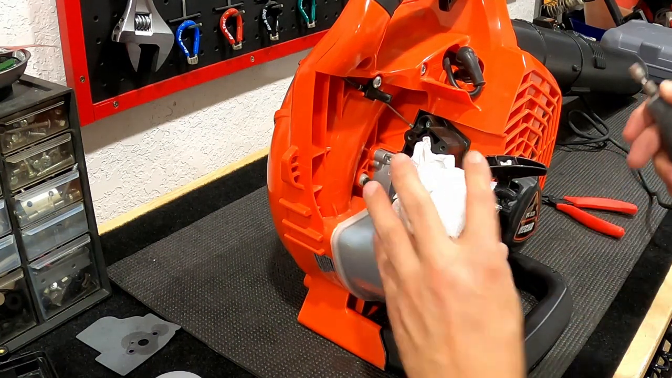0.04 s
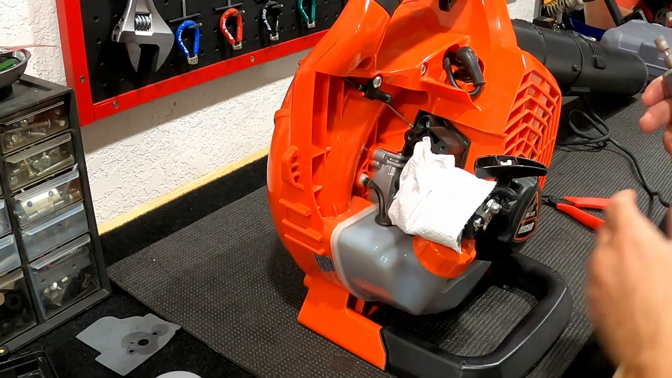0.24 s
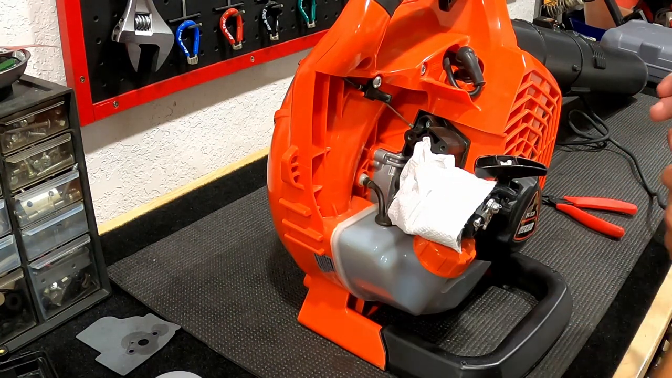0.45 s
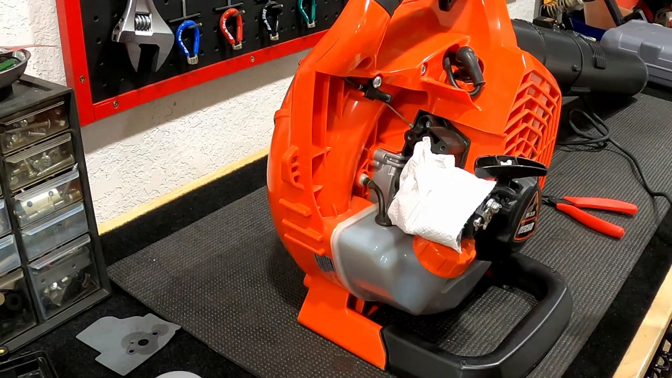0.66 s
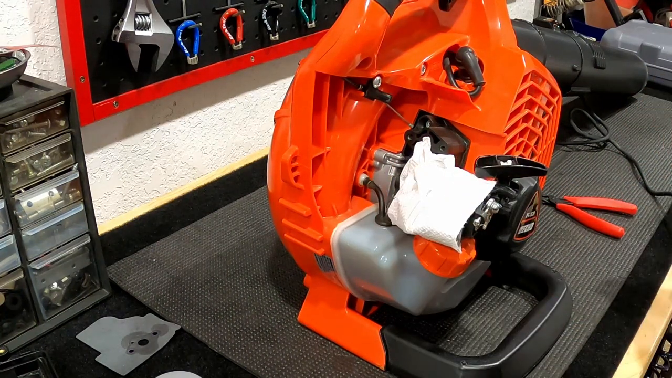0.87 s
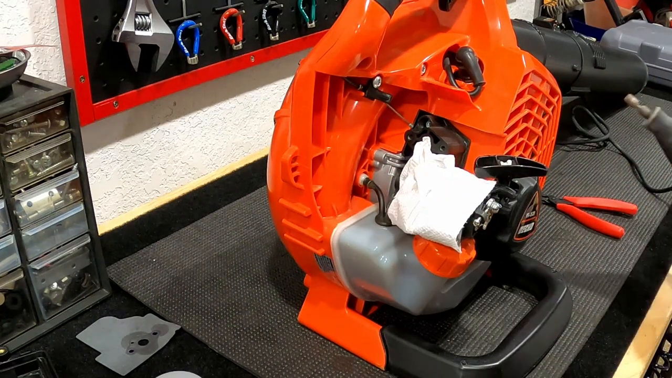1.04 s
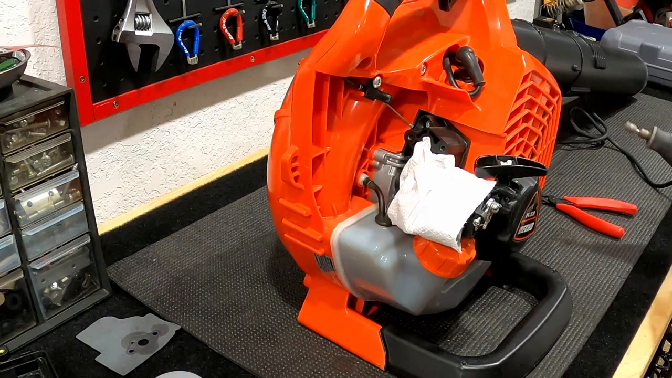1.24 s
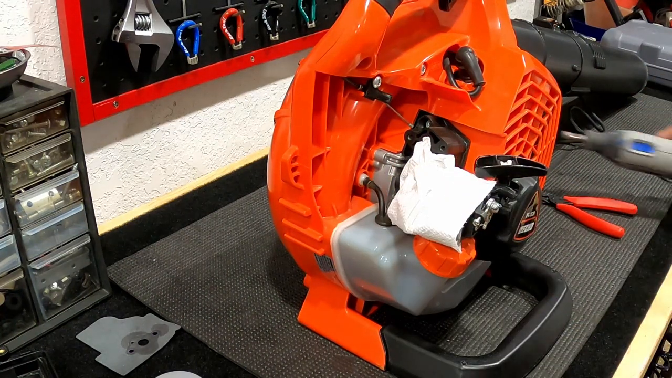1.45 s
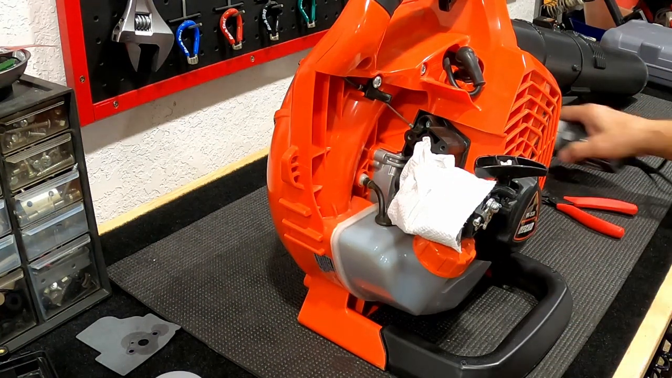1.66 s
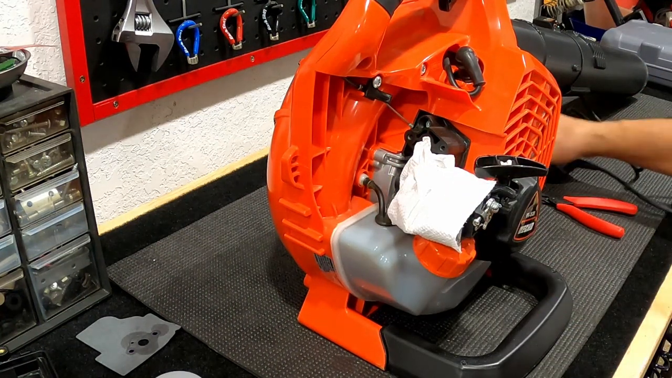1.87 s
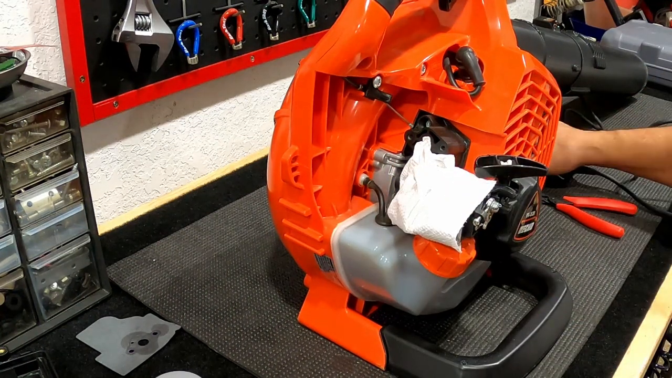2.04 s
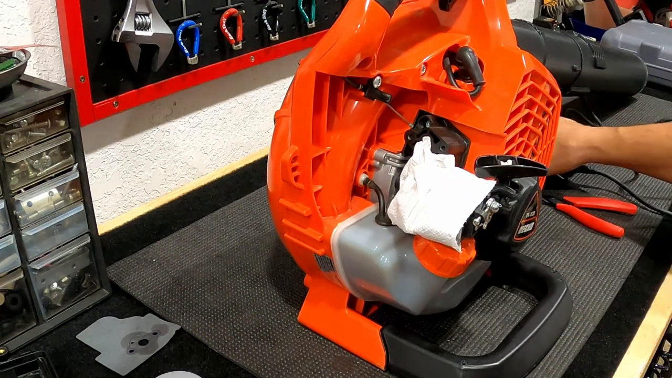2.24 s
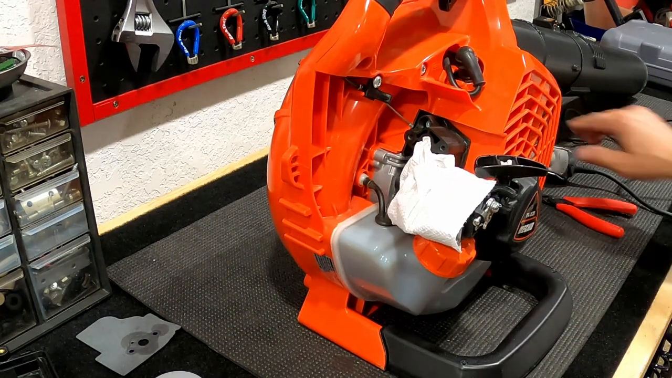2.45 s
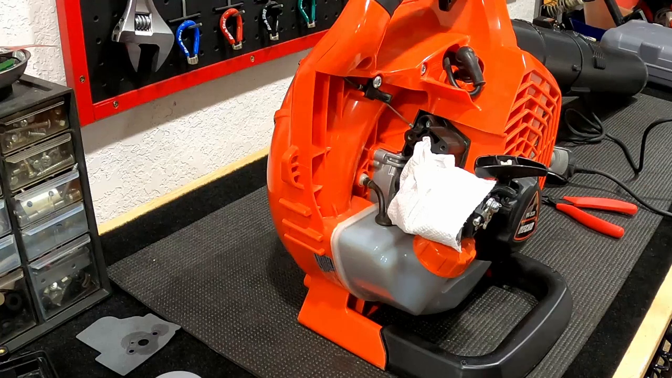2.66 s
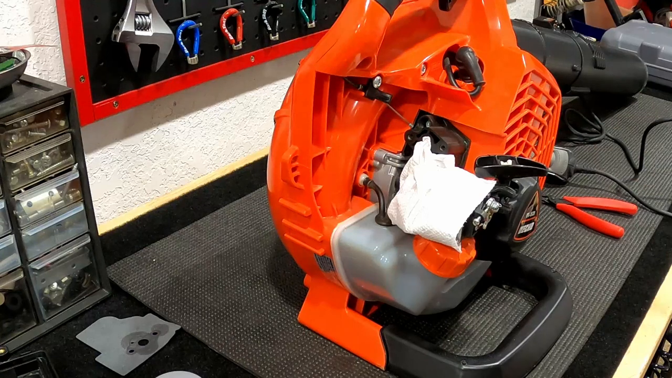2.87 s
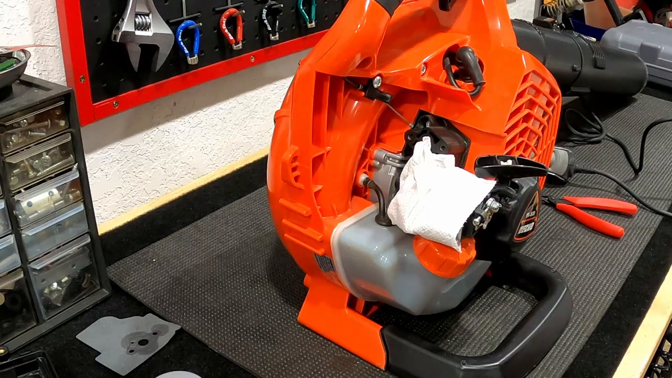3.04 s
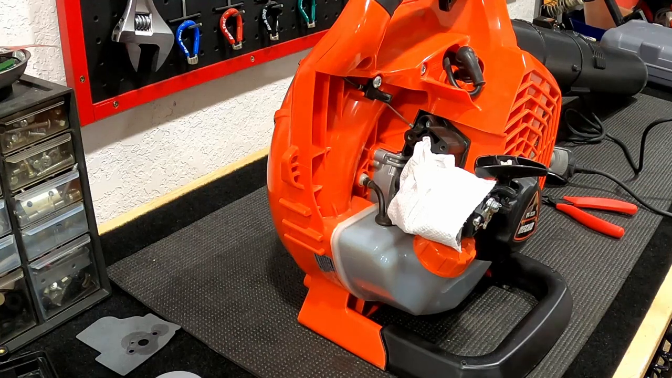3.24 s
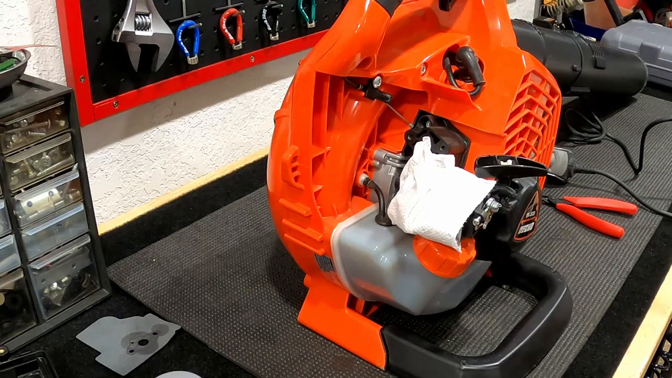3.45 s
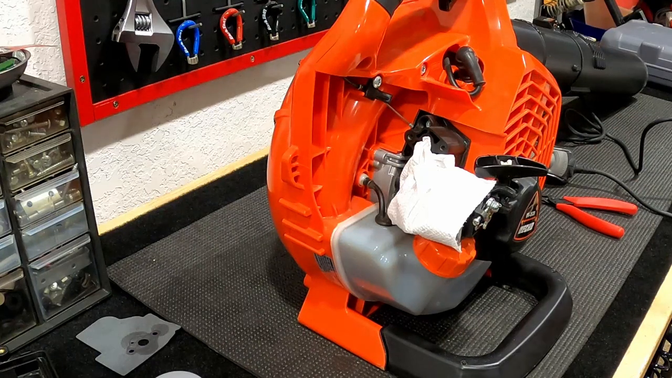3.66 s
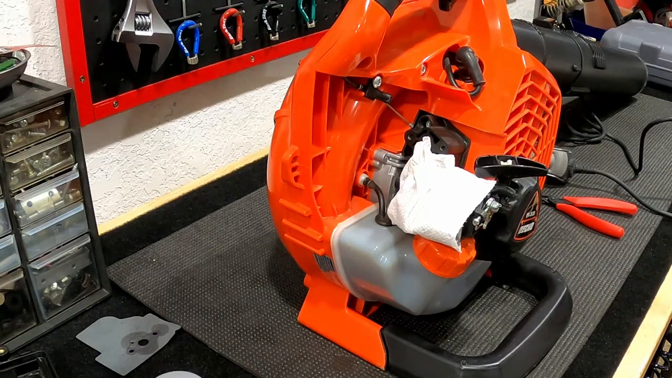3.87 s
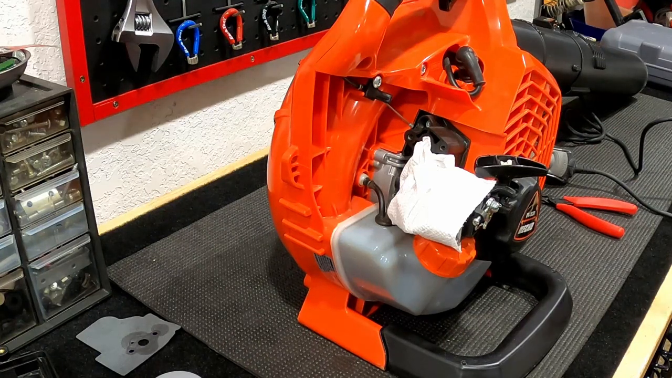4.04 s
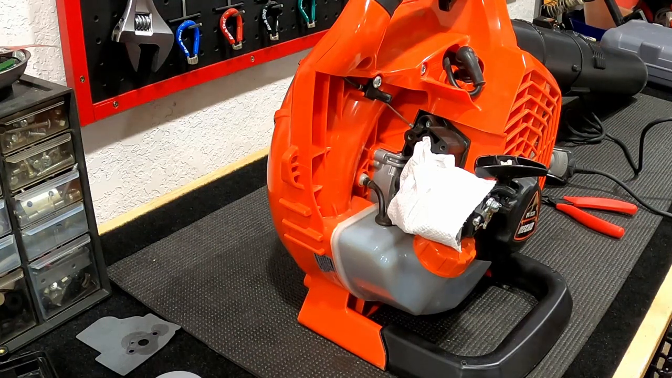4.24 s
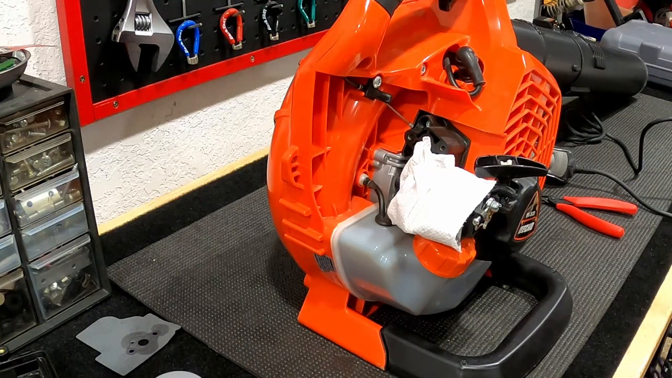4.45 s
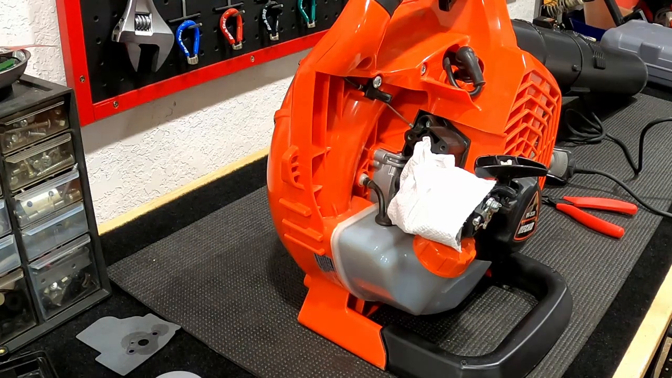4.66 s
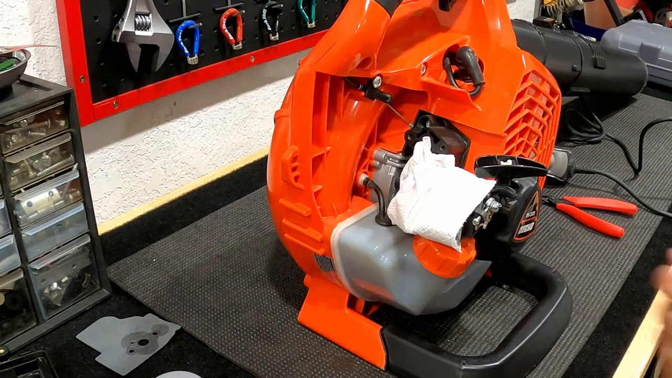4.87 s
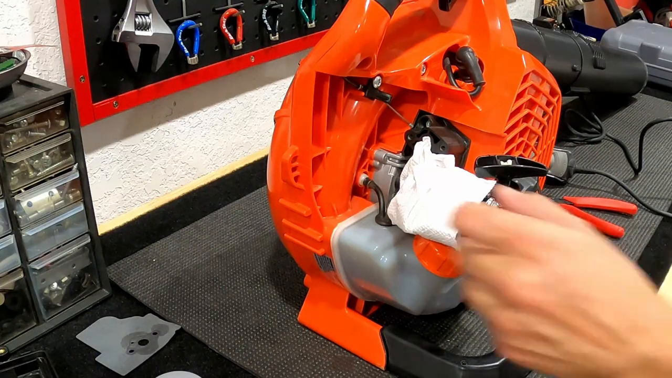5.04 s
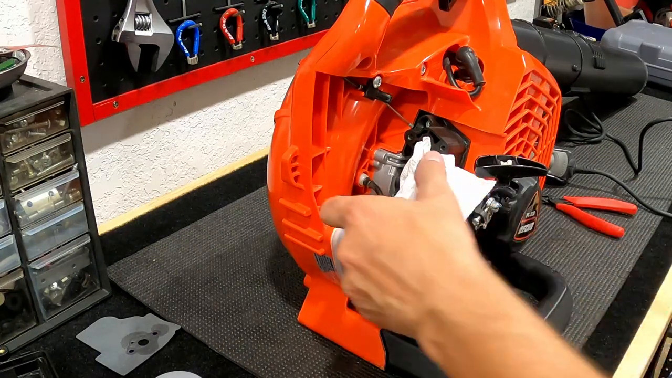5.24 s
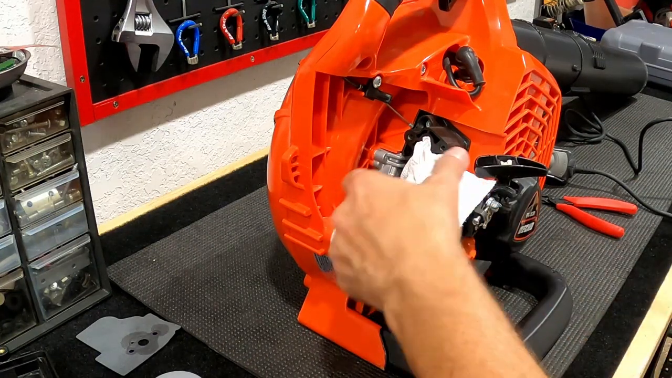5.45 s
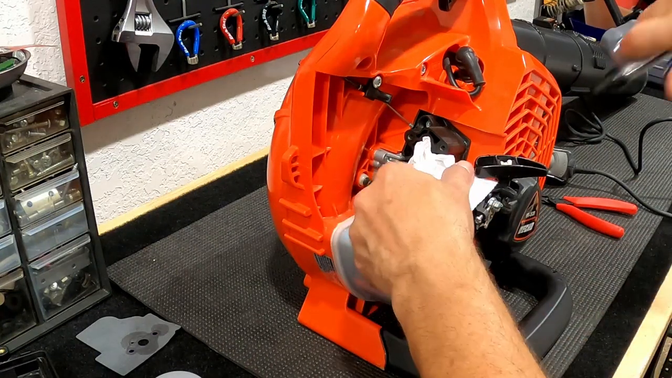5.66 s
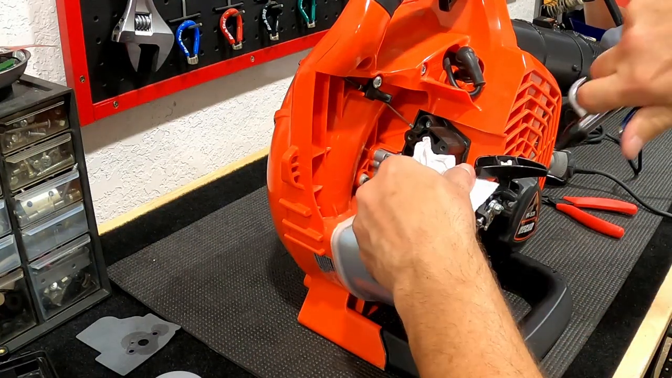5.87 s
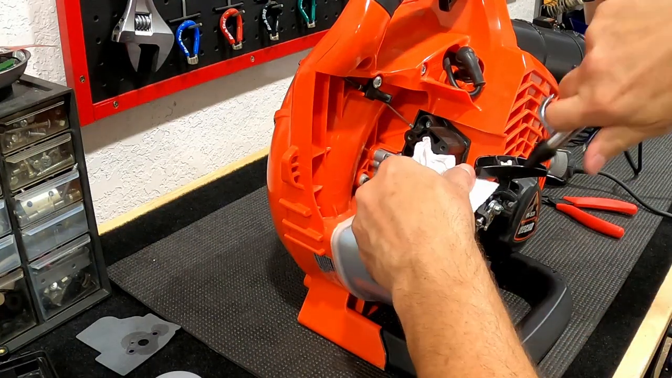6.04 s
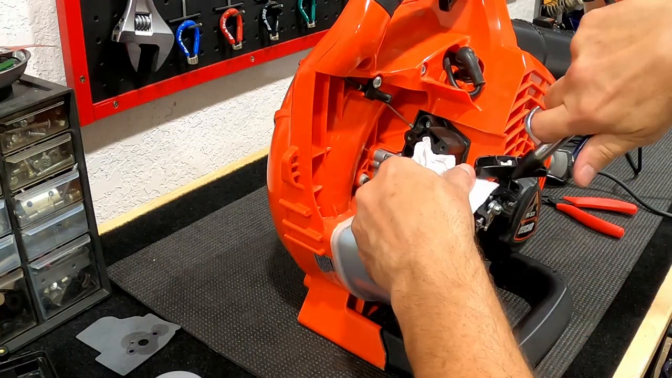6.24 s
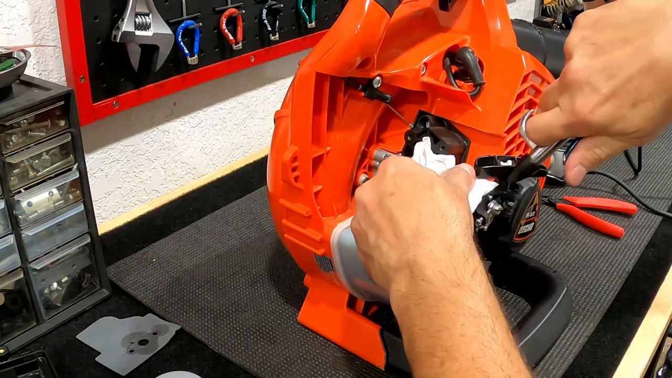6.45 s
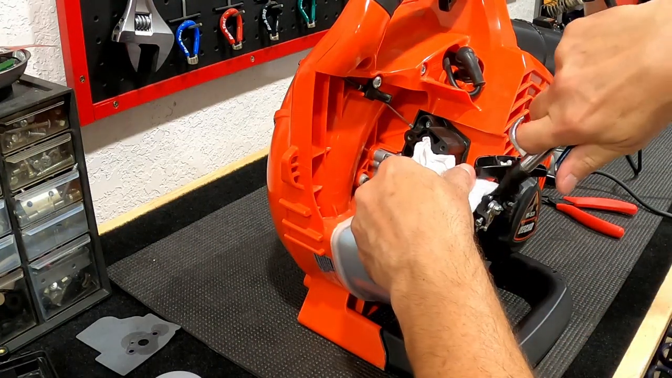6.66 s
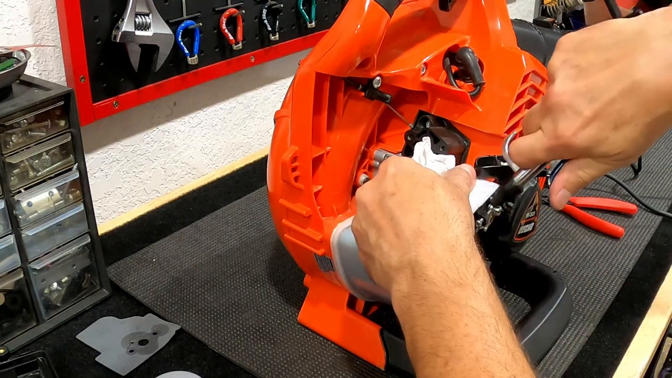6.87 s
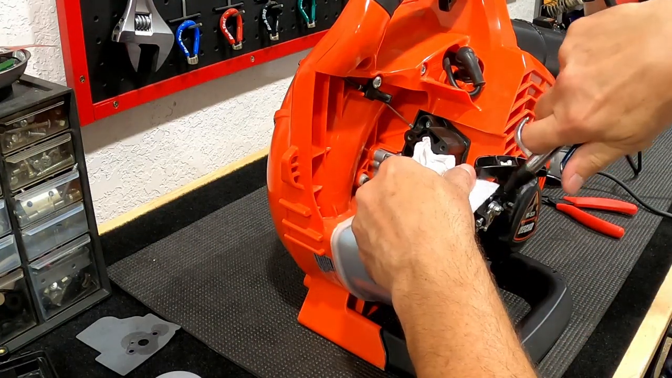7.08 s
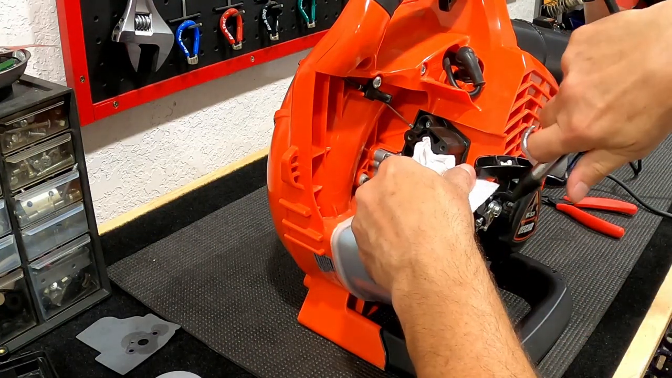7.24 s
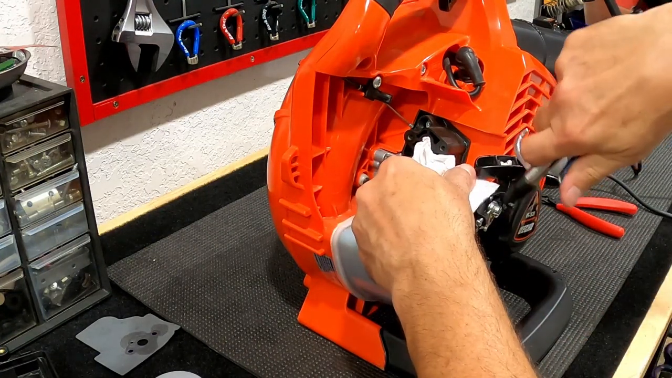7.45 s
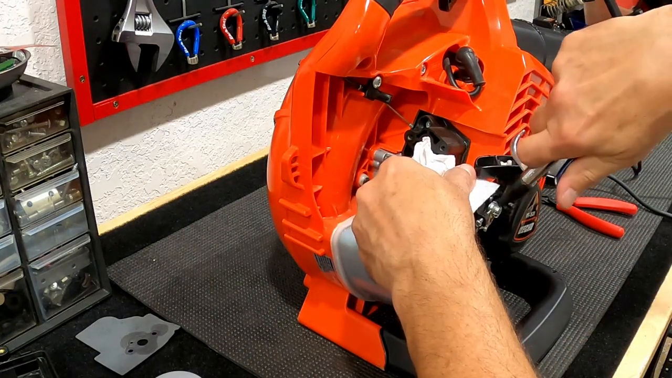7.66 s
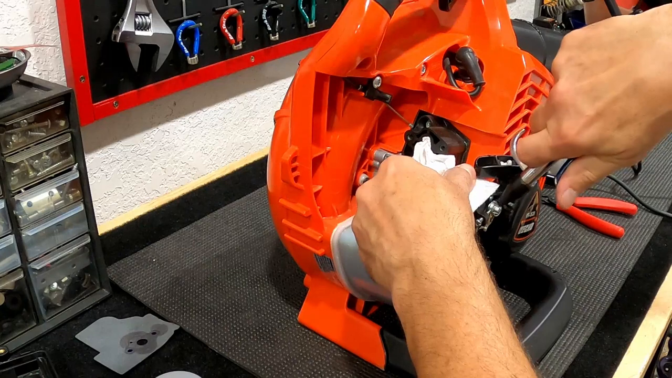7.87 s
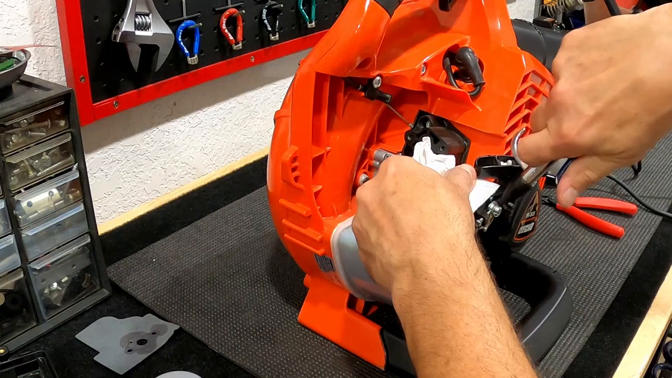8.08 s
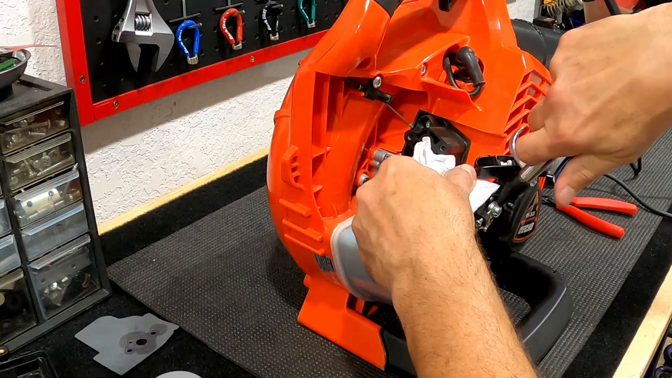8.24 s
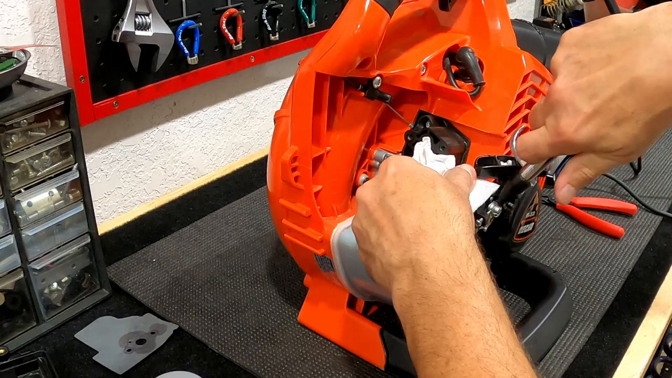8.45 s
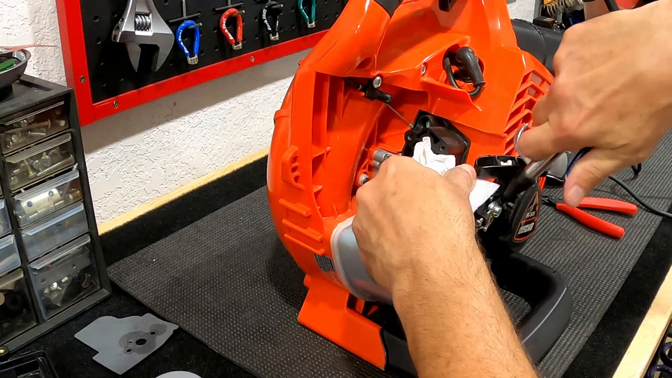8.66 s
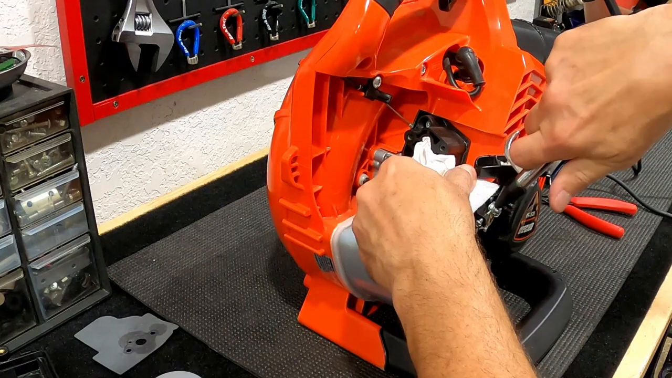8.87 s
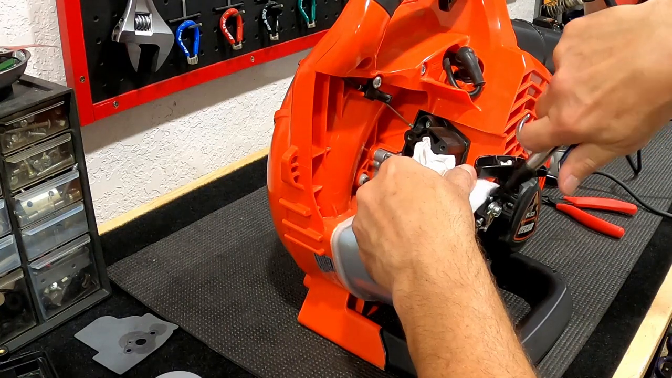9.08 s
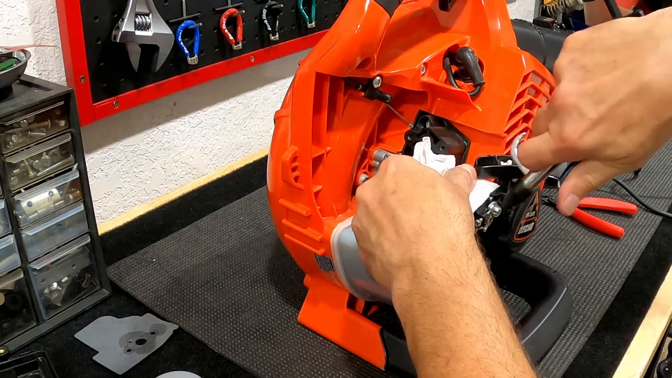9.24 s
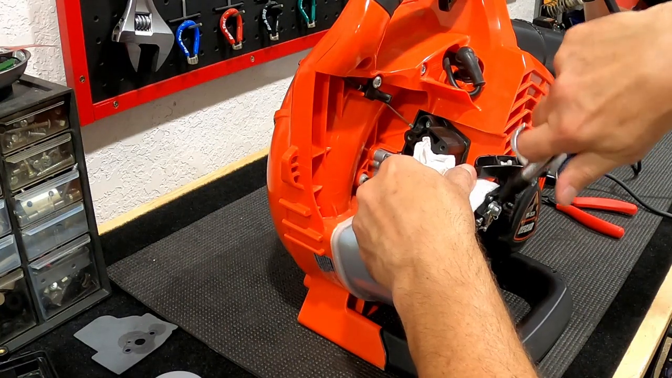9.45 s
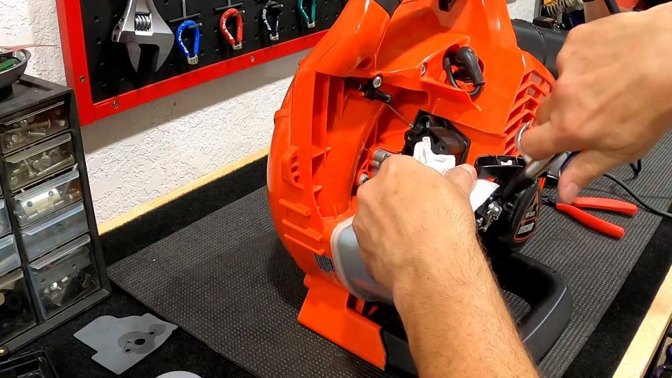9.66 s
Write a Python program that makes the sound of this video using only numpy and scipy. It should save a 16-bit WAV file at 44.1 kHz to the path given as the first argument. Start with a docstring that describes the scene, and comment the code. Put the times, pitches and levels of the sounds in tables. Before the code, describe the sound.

A rotary tool whines, winds down and is set down, then an air hose snaps in with a puff and a blow gun hisses loudly.

```python
"""In a workshop, a rotary tool whines over a bench, is switched off, coasts to a stop and is laid down.
Across the room an air hose snaps into its coupler with a puff of coloured noise and ringing metal.
Then a blow gun hisses in three blasts over an engine housing, its draught buffeting the right port at first.
The tool is made of sine waves tied to one slowing shaft, plus noise for its air and brushes.
Low rumble and electric hum lie under everything."""
import sys
import numpy as np
from scipy import signal
from scipy.fft import rfft, irfft, next_fast_len
from scipy.io import wavfile
from scipy.ndimage import uniform_filter1d, map_coordinates

SR = 44100
rng = np.random.default_rng(int(sys.argv[2]) if len(sys.argv) > 2 else 0)


def int16_out(signal):
    """Quantize to a 16-bit WAV file."""
    q = np.round(np.clip(np.atleast_2d(signal).T, -1, 1) * 32767)
    wavfile.write(sys.argv[1], SR, q.astype(np.int16))


N = 428211
TIME = np.arange(N) / SR  # s

# Noise colours give the relative level per Hz; each noise is then scaled to rms 1.
# rotary tool: the shaft under power: t/s, speed/Hz (turns per second)
POWERED_SPEED = [(0, 293), (.45, 300.7), (.6, 301.3), (.78, 300.5)]
POWER_OFF_S = .78
FRICTION_HZ_PER_S, AIR_DRAG_PER_TURN = 99.5, .00042
# overtones of the shaft and its bearings: multiple of the speed, driven level/dB, coasting level/dB
SHAFT_OVERTONES = [(1, -9, -11), (3, -13, -15), (4, -18, -23), (6, -18, -18), (7, -18, -10), (8, -30, -14),
                   (9, -14, -8), (10, -9, -15), (11, -15, -4), (12, -12, -7), (13, -16, -16),
                   (15, -11, -10), (16, -22, -12), (19, -22, -16), (21, -28, -14), (24, -13, -8)]
# how well the tool's shell radiates: f/Hz, level/dB
SHELL_RESPONSE = [(150, -22), (300, 1), (420, -16), (680, -13), (820, -4), (950, 3), (1200, -6), (1550, 3),
                  (1800, -5), (2100, -10), (2500, -2), (2850, 5), (3500, -5), (4200, -1), (6000, -1),
                  (8000, -4), (10000, -11), (16000, -45)]
# the fan tone swells and fades as the tool is turned: t/s, level/dB
FAN_LEVEL = [(0, -26.5), (.34, -31.5), (.6, -23.5), (.82, -26), (.9, -34.5), (1.48, -39.5), (1.57, -32.5),
             (1.63, -37.5), (1.79, -32), (2.06, -48.5), (2.52, -57), (2.65, -77), (3.4, -110)]
# the mains' half waves split the commutator tone: steps of 120 Hz, level against the fan tone/dB
COMMUTATOR_SPLIT = [(-1, -15), (0, -6), (1, -7), (2, -15), (3, -13), (4, -16)]
# colour of the cooling air: f/Hz, level/dB
COOLING_AIR_COLOUR = [(150, -41), (350, -13.5), (700, -11.5), (950, -3), (1400, 0.5), (2000, -0.5),
                      (2800, 4), (3500, 1.5), (4500, -2), (5800, -4), (7500, -17), (11000, -20),
                      (15000, -32)]
# colour of the brush hiss: f/Hz, level/dB
BRUSH_COLOUR = [(400, -11), (700, -14), (950, 1.5), (1500, 7.5), (2100, -1.5), (2900, 3), (4500, 2),
                (7000, -5.5), (9500, -6), (12500, -10), (15000, -20)]
# the whine: level at full speed, extra under power; its amplitude follows this power of the speed
WHINE_DB, WHINE_POWERED_DB, WHINE_SPEED_POWER = -31.4, 3.5, 1.1
# the cooling air: the same three settings
AIR_DB, AIR_POWERED_DB, AIR_SPEED_POWER = -33.3, 2.6, 3.8
# the brush hiss: level, extra under power, speed around which it starts to fade
BRUSH_DB, BRUSH_POWERED_DB, BRUSH_FADE_HZ = -42.5, 3.5, 90
# high multiples: most only rattle, those of the eight commutator bars stand out; all change under power
RATTLE_DB, BARS_DB, BARS_POWERED_DB = -36, -17, -14
LOOSEN_DB = 10  # the high multiples gain this much as the shaft slows to rest
STALL_HZ = 75  # below this speed the tones fade away

# the room at rest: colour of the rumble: f/Hz, level/dB
RUMBLE_COLOUR = [(12, -38), (20, -7), (59, 3), (189, -9.5), (242, -10.5), (294, -12.5), (377, -10.5),
                 (525, -24), (818, -29.5), (1350, -22.5), (1550, -30.5), (3760, -31.5), (5380, -29),
                 (9110, -41.5), (15000, -65)]
RUMBLE_DB = -51.5
# how alike the rumble is left and right: f/Hz, likeness (1 = same, -1 = opposite)
LEFT_RIGHT_LIKENESS = [(60, 0.97), (180, 0.66), (550, 0.7), (1650, 0.84), (4970, 0.3), (15000, -0.35)]
# electric hum: f/Hz, level/dB
HUM_TONES = [(60, -62), (161.5, -61), (240, -52.5), (355, -72.5)]
# how long the workshop echoes: f/Hz, time to fall by 60 dB/s
ECHO_T60 = [(150, 0.92), (1200, 0.69), (5000, 0.63), (12000, 0.48)]
# side share of diffuse sound at two close ports: f/Hz, share
DIFFUSE_SIDE = [(150, .2), (700, 0.27), (3000, 0.59), (9000, 1.43)]
TOP_HZ = 15500  # the microphone's band limit

# knocks of tool and hose being handled: t/s, level/dB
HANDLING_KNOCKS = [(1.8, -28), (2.009, -31.5), (3.18, -54), (3.618, -39), (4.015, -42), (5.796, -35.5),
                   (5.813, -41), (5.839, -39)]
# colour of knocks and dragging: f/Hz, level/dB
HANDLING_COLOUR = [(300, -6), (700, -8.5), (1200, -3.5), (1800, -2.5), (2700, -7), (4500, -17.5),
                   (7000, -30), (9500, -31.5), (13000, -54)]
# soft bumps on the bench mat: t/s, level/dB
MAT_BUMPS = [(1.8, -43.5), (2.015, -33), (3.63, -43), (5.798, -43)]
# the hose drags over the bench: t of full tug/s, level/dB, rise/s, time to fall by 60 dB/s
HOSE_TUGS = [(5.09, -56, .04, .25), (5.5, -55.5, 0.096, 0.58), (5.84, -46.5, .012, 0.35)]

# air escapes from the coupler: start t/s, length/s, level/dB
AIR_BURSTS = [(4.03, .068, -44), (4.099, 0.014, -17), (4.141, 0.049, -19), (4.206, 0.063, -31)]
BURST_RISE_S, BURST_T60_S = 0.0044, 0.086
# colour of those bursts: f/Hz, level/dB
BURST_COLOUR = [(59, -58), (100, -16), (200, -4), (359, -6), (425, -8.5), (660, -3.5), (831, -10.5),
                (923, -0.5), (1370, 1), (1490, -2), (2990, -13), (5040, -11), (7510, -30.5), (9070, -26.5),
                (15000, -64)]
# colour of the plug's crack as it snaps in: f/Hz, level/dB
CRACK_COLOUR = [(500, -25), (1100, -7), (1700, -6), (2400, 0), (3200, -12), (6000, -10), (15000, -36)]
# sharp spits of air as the plug seats: start t/s, length/s, level/dB
AIR_SPITS = [(4.097, .008, -30), (4.145, .02, -34), (4.366, .005, -45)]
# metal ringing on after the snap: f/Hz, starting level/dB, time to fall by 60 dB/s
RINGING_METAL = [(964, -57, .4), (1070, -32.5, 1.07), (1370, -38, .5), (1513, -49.5, 3), (2080, -50, 1.6),
                 (2500, -44, .4)]

# the blow gun's trigger: open t/s, shut t/s, flow level/dB
TRIGGER_PULLS = [(6.166, 6.323, -1), (6.327, 6.439, -15.5), (6.438, 8.647, 0), (8.654, 8.701, -14),
                 (8.861, 9.8, 0)]
# the nozzle's aim shifts the balance: t/s, roar on the housing/dB, nozzle hiss/dB
NOZZLE_AIM = [(6.2, -24.3, -25.5), (6.45, -24, -30), (6.63, -26, -25.5), (6.9, -23.5, -31),
              (7.32, -22.8, -26), (7.72, -22.6, -29.5), (8.25, -22.5, -27.5), (8.9, -21.5, -25.5),
              (9.25, -23, -26), (9.7, -23, -28)]
# colour of the jet: f/Hz, level/dB
JET_SPECTRUM = [(59, -42), (100, -12), (162, -6.5), (253, -15.5), (614, -11), (774, -12), (1020, -10.5),
                (2270, -2.5), (2690, -1), (3460, 1), (5510, -4), (8060, -7), (8950, -2), (12000, -15.5),
                (15500, -36)]
# hollows of the housing: f/Hz, width/Hz, lift/dB
HOUSING_HOLLOWS = [(2290, 150, 3), (2730, 230, -2), (3200, 450, 0), (3750, 250, -2), (4600, 700, 2.5),
                   (5140, 590, -3), (6030, 190, 1.5), (8100, 600, -0.5), (8700, 600, 1)]
# the jet whistles on an edge: middle t/s, length/s, level/dB
EDGE_WHISTLES = [(7.872, .18, -35), (8.103, .1, -38), (8.35, .06, -38), (8.507, 0.037, -31.5),
                 (9.66, 0.045, -38)]
# the jet dips briefly: middle t/s, length/s, depth/dB
JET_DIPS = [(6.822, 0.023, 4), (7.364, 0.022, 3), (7.564, 0.034, 5), (7.95, 0.037, 2), (8.052, 0.029, 3.5),
            (9.402, 0.025, 6.5)]
SURGE_DB, SURGE_S = 5, 0.021  # stored pressure overshoots at each opening (full flow), then decays
SPREAD_DB, NARROWING_S, NARROWING_DB_PER_S = -4.5, 6.38, 35  # the jet sounds wide at first, then narrows

# gusts of draught: start t/s, length/s, level/dB, left against right/dB, time to fall by 60 dB/s
DRAUGHT_GUSTS = [(6.164, 0.063, -19.5, -34, 0.41), (6.257, 0.055, -32, -27, 0.078),
                 (6.455, 0.16, -28.5, -29, 0.63), (7.327, 0.026, -24, 2, .06), (9.375, .04, -39, -2, .2)]
GUST_RISE_S, STRAY_AIR_DB = 0.0099, -49
# colour of the buffeting: f/Hz, level/dB
BUFFET_COLOUR = [(12, -33), (20, 0), (49, 3.5), (211, -3.5), (290, -9.5), (330, -10.5), (461, -16.5),
                 (900, -26), (1170, -24), (1980, -120)]
# colour of the stray air fizzing across the right port: f/Hz, level/dB
FIZZ_COLOUR = [(500, -19), (2000, 2), (6000, 12), (11000, 1), (15000, -8)]


def amp(db):
    """Decibels to gain."""
    return 10 ** (np.asarray(db) / 20)


def unit(x):
    """Scale to rms 1."""
    return x / np.sqrt(np.mean(x ** 2) + 1e-20)


def along(points, hz):
    """Read a curve of (f/Hz, value) points on a log frequency axis."""
    f, value = np.transpose(points)
    return np.interp(np.log(hz + 1), np.log(f + 1), value)


def curves(rows):
    """One value per sample for each column after the time."""
    s, *columns = np.transpose(rows)
    return [np.interp(TIME, s, column) for column in columns]


def gate(start, end, edge):
    """1 between two times, with straight ramps centred on them."""
    return np.clip(np.minimum(TIME - start, end - TIME) / edge + .5, 0, 1)


def swell(start, length, rise, t60):
    """Straight rise, hold until length has passed, exponential release."""
    release_db = -60 * np.maximum(TIME - start - length, 0) / t60
    return np.clip((TIME - start) / rise, 0, 1) * amp(release_db)


def wobble(rate):
    """A smooth random curve with rate knots a second."""
    knots = rng.standard_normal(int(N * rate / SR) + 4)
    return map_coordinates(knots, [TIME * rate], order=2)


def filtered(x, response):
    """Shape the spectrum of x by a response that depends on frequency."""
    m = next_fast_len(N + SR // 2)
    gain = response(np.fft.rfftfreq(m, 1 / SR))
    return irfft(rfft(x, m) * gain, m)[..., :N]


def noise(spectrum):
    """Noise of rms 1 with the given colour."""
    return unit(filtered(rng.standard_normal(N), lambda hz: amp(along(spectrum, hz))))


def in_room(x, wet_db, width):
    """Add the workshop's decaying echo at the same total power; width scales the echo's side part."""
    hz, t, z = signal.stft(rng.standard_normal((2, SR * 3 // 4)), SR, nperseg=256)
    z = z * amp(-60 * t / along(ECHO_T60, hz)[:, None])
    z[1] *= along(DIFFUSE_SIDE, hz)[:, None]
    tail = signal.istft(z, SR, nperseg=256)[1]
    tail = tail / np.linalg.norm(tail[0])
    mid, side = signal.fftconvolve(x[None], tail, axes=1)[:, :N]
    echo = np.array([mid + width * side, mid - width * side])
    return (x + amp(wet_db) * echo) / np.hypot(1, amp(wet_db))


def from_right(pair, left_db):
    """Sound from the right reaches the left port two samples late; left_db raises left and lowers right."""
    late_left = np.pad(pair[0], (2, 0))[:N]
    return np.array([late_left * amp(left_db), pair[1] * amp(-left_db)])


def shaft_speed():
    """Follows the set speed under power; then friction and air drag brake the shaft to a stop."""
    running, = curves(POWERED_SPEED)
    # speed at which air drag brakes as hard as friction
    even_hz = np.sqrt(FRICTION_HZ_PER_S / AIR_DRAG_PER_TURN)
    braked = np.maximum(TIME - POWER_OFF_S, 0) * FRICTION_HZ_PER_S / even_hz
    return even_hz * np.tan(np.maximum(np.arctan(running / even_hz) - braked, 0))


def overtones(speed, angle, driven):
    """Multiples of the shaft speed flare as they cross the shell's resonances, and fade as it stalls."""
    turning = np.count_nonzero(speed)
    speed, angle, driven = speed[:turning], angle[:turning], driven[:turning]
    loose_db = BARS_POWERED_DB * driven + LOOSEN_DB * (1 - speed / speed.max())
    lower = [(k, driven * driven_db + (1 - driven) * coast_db) for k, driven_db, coast_db in SHAFT_OVERTONES]
    upper = [(k, loose_db + (RATTLE_DB if k % 8 else BARS_DB)) for k in range(25, 89)]
    knots = np.arange(0, 4, .05)
    whine = np.zeros(turning)
    for k, db in lower + upper:
        # short waves flutter as the tool moves
        flutter = np.interp(TIME[:turning], knots, rng.standard_normal(len(knots)))
        flutter_db = min(k, 10) / 10 * 3.9 * flutter
        level = amp(db + along(SHELL_RESPONSE, k * speed) + flutter_db)
        tone = np.sin(k * angle + 2 * np.pi * rng.random())
        whine += level * tone * (k * speed < TOP_HZ)
    return np.pad(whine * np.minimum(speed / STALL_HZ, 1) ** 2, (0, N - turning))


def rotary_tool():
    """Five fan blades and an eight-bar commutator on one shaft, with cooling air and brush hiss."""
    speed = shaft_speed()
    pace = speed / speed.max()
    angle = 2 * np.pi * np.cumsum(speed * (1 + .0004 * wobble(35))) / SR
    driven = gate(-1, POWER_OFF_S, 0.047)
    mains = 2 * np.pi * 120 * TIME  # phase of the mains' half waves

    whine_level = amp(WHINE_DB + WHINE_POWERED_DB * driven) * pace ** WHINE_SPEED_POWER
    whine = whine_level * overtones(speed, angle, driven)

    fan_db, = curves(FAN_LEVEL)
    coasting_flicker = amp((1 - driven) * 3.7 * wobble(32.08))
    fan = np.sqrt(2) * np.sin(5 * angle + 0.19 * wobble(70)) * coasting_flicker
    commutator = driven * sum(amp(db + wobble(14.7)) * np.sin(8 * angle + step * mains)
                              for step, db in COMMUTATOR_SPLIT)

    air_level = amp(AIR_DB + AIR_POWERED_DB * driven) * pace ** AIR_SPEED_POWER
    air = air_level * noise(COOLING_AIR_COLOUR) * (1 + 0.33 * driven * np.sin(mains))
    rub = amp(BRUSH_DB + BRUSH_POWERED_DB * driven) * (speed / np.hypot(speed, BRUSH_FADE_HZ)) ** 1.2
    brushes = rub * noise(BRUSH_COLOUR) * (1 + 0.35 * np.sin(angle))  # pulses once a turn

    rush = in_room(air + brushes, wet_db=-1.5, width=0.98)
    tones = in_room(whine, wet_db=-8, width=1.8)
    leading = in_room(amp(fan_db) * (fan + commutator), wet_db=-10.5, width=2.4)
    return from_right(rush + tones, left_db=-1.0) + from_right(leading, left_db=-1.2)


def room_tone():
    """Low rumble, partly alike in both ports, and an almost steady electric hum."""
    def turn(hz):
        return np.arccos(np.clip(along(LEFT_RIGHT_LIKENESS, hz), -1, 1)) / 2

    pair = np.array([noise(RUMBLE_COLOUR), noise(RUMBLE_COLOUR)])
    mid, side = filtered(pair, lambda hz: np.array([np.cos(turn(hz)), np.sin(turn(hz))]))
    hum = sum(amp(db + .7 * wobble(4)) * np.sqrt(2) * np.sin(2 * np.pi * hz * TIME) for hz, db in HUM_TONES)
    return amp(RUMBLE_DB) * np.array([mid + side, mid - side]) + hum


def handling():
    """Short plastic knocks, dull bumps on the mat, and the hose dragging, all as shaped noise."""
    def decay(s, db, t60):
        fall_db = -60 * np.maximum(TIME - s, 0) / t60
        return gate(s + 0.00088, s + 1, 0.0023) * amp(db + fall_db)

    clack = amp(-0.5) * sum(decay(s, db, t60=0.049) for s, db in HANDLING_KNOCKS)
    thud = sum(decay(s, db, t60=0.43) for s, db in MAT_BUMPS)
    tugs = sum(amp(db) * swell(s - rise, rise, rise, t60) for s, db, rise, t60 in HOSE_TUGS)
    drag = (tugs + amp(-62.5) * gate(5.68, 5.82, .1)) * amp(3.4 * wobble(60))
    bumps = thud * noise([(25, -1), (70, 9.5), (150, -9), (500, -17), (1500, -58)])
    scrapes = in_room((clack + drag) * noise(HANDLING_COLOUR), wet_db=1, width=0.96)
    return from_right(scrapes, left_db=1.0) + bumps


def coupler():
    """The plug cracks in and air bursts out until it seats; nearby metal rings on as fading sines."""
    age = np.maximum(TIME - 4.1, 0)  # s since the snap
    escape = sum(amp(db) * swell(s, length, BURST_RISE_S, BURST_T60_S) for s, length, db in AIR_BURSTS)
    puff = escape * amp(1.3 * wobble(120)) * noise(BURST_COLOUR)
    crack = amp(-17 - 60 * age / .07) * noise(CRACK_COLOUR) * gate(4.099, 4.4, 0.0028)
    spits = sum(amp(db) * gate(s, s + length, .003) for s, length, db in AIR_SPITS)
    spit = spits * noise([(1500, -20), (4500, -2), (9000, -3), (15000, -31)])
    ring = sum(amp(db - 60 * age / t60) * np.sin(2 * np.pi * hz * age) for hz, db, t60 in RINGING_METAL)
    return from_right(in_room(puff + crack + spit, wet_db=-0.5, width=0.86) + ring, left_db=.1)


def valve(edge):
    """Air flow through the blow gun, as a gain with ramps of edge seconds."""
    return sum(amp(db) * gate(start, end, edge) for start, end, db in TRIGGER_PULLS)


def eddies(depth_db):
    """White noise with random patches of gain in time and frequency, like turbulence."""
    z = signal.stft(rng.standard_normal(N), nperseg=512)[2]
    patches = uniform_filter1d(rng.standard_normal(z.shape), size=6, axis=0)
    patches = uniform_filter1d(patches, size=12, axis=1)
    return signal.istft(z * amp(depth_db * unit(patches)), nperseg=512)[1][:N]


def blow_gun():
    """A turbulent jet roars below and hisses above about 6300 Hz, coloured by the housing's hollows."""
    def colour(hz):
        lift_db = sum(db / (1 + (2 * (hz - centre) / width) ** 2) for centre, width, db in HOUSING_HOLLOWS)
        return amp(along(JET_SPECTRUM, hz) + lift_db)

    def low_share(hz):
        return 1 / (1 + (hz / 6300) ** 8)

    roar_db, hiss_db = curves(NOZZLE_AIM)
    roar = unit(filtered(eddies(depth_db=1.5), lambda hz: colour(hz) * np.sqrt(low_share(hz))))
    hiss = unit(filtered(eddies(depth_db=1.55), lambda hz: colour(hz) * np.sqrt(1 - low_share(hz))))
    jet = amp(roar_db + 1.05 * wobble(12)) * roar + amp(hiss_db + 1.7 * wobble(20)) * hiss
    edge = sum(amp(db) * gate(s - length / 2, s + length / 2, .04) for s, length, db in EDGE_WHISTLES)
    jet += edge * noise([(10000, -60), (11400, -6), (11950, 0), (12500, -9), (14000, -55)])

    surge_db = SURGE_DB * sum((TIME > s) * np.exp(-np.abs(TIME - s) / SURGE_S) * amp(db)
                              for s, _, db in TRIGGER_PULLS)
    dip_db = sum(db * gate(s - length / 2, s + length / 2, 0.013) for s, length, db in JET_DIPS)
    flicker_db = 1.03 * wobble(40) + 0.28 * wobble(300)
    flow = valve(edge=0.014) * amp(surge_db - dip_db + flicker_db)

    narrowing_db = NARROWING_DB_PER_S * np.maximum(TIME - NARROWING_S, 0)
    spread = amp(SPREAD_DB - narrowing_db) + amp(-43)  # a trace of width stays
    side_noise = noise([(600, -1), (2000, -13), (4500, 0), (9000, 5.5), (12500, 1), (15500, -36)])
    side = spread * amp(hiss_db + 5.5) * flow * side_noise
    return in_room(jet * flow, wet_db=-8.0, width=spread) + np.array([side, -side])


def draught():
    """Stray air tumbles over the ports in gusts; the first blast also fizzes across the right one."""
    def ports(pan_db):
        return 2 / (1 + amp([[-pan_db], [pan_db]]))

    gusts = sum(amp(db) * ports(pan_db) * swell(s, length, GUST_RISE_S, t60)
                for s, length, db, pan_db, t60 in DRAUGHT_GUSTS)
    stray = amp(STRAY_AIR_DB + 3.2 * wobble(18))
    buffet = (gusts + stray) * amp(1.1 * wobble(35)) * noise(BUFFET_COLOUR)
    fizz = amp(-19) * swell(6.163, length=0.017, rise=0.0036, t60=.4) * noise(FIZZ_COLOUR)
    return valve(edge=0.01) * buffet + fizz * np.array([[0], [1]])


def scene():
    """Everything heard at the bench, as a left and right pair."""
    return rotary_tool() + room_tone() + handling() + coupler() + blow_gun() + draught()


def record(dry):
    """The microphone rounds off its largest swings and keeps nothing above its band limit."""
    rounded = dry / (1 + np.abs(dry / .8) ** 6) ** (1 / 6)
    return filtered(rounded, lambda hz: hz < TOP_HZ)


dry = scene()
out = record(dry)
int16_out(out)
```